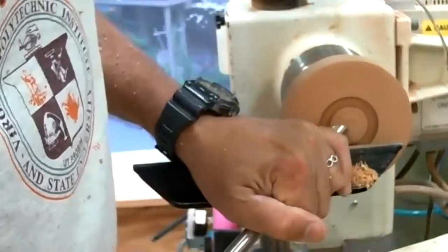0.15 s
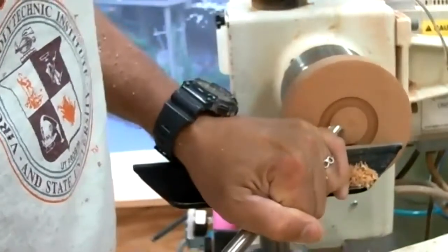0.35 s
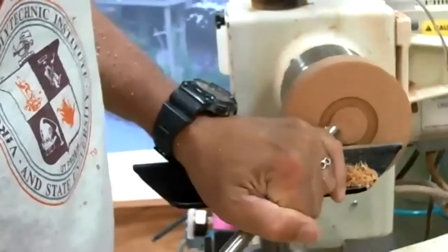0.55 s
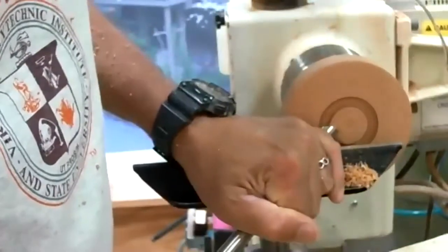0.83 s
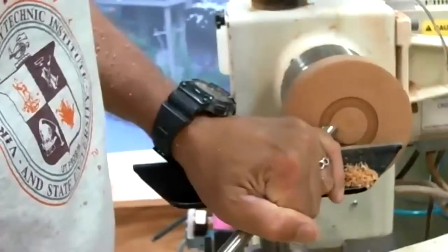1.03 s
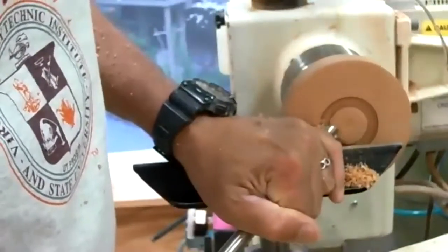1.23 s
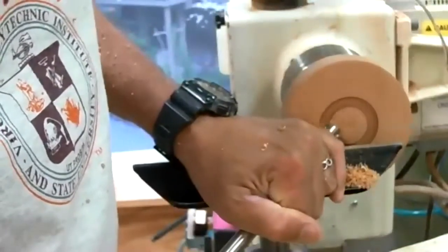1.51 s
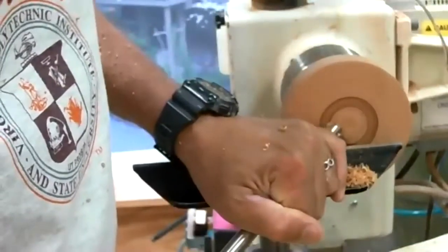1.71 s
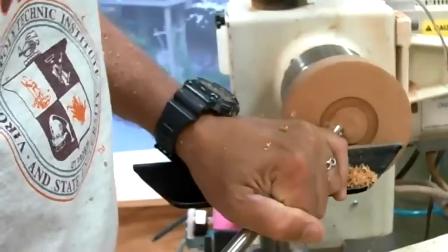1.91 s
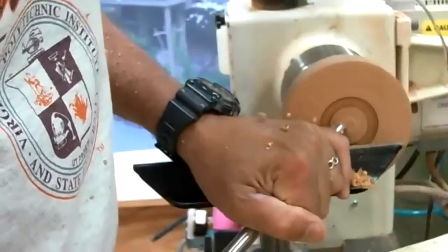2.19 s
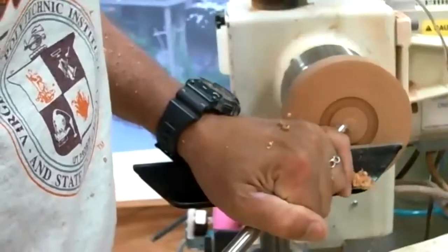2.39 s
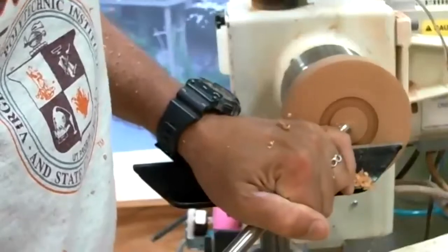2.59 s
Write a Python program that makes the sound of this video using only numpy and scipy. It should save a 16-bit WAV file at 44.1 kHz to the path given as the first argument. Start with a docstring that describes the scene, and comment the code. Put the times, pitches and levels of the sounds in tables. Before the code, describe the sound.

A gouge cuts a spinning wooden bowl: light scrapes, then a loud bright rasp falling in pitch

```python
"""A gouge crosses the face of a small wooden bowl spinning on a lathe, close by in a workshop.
First it skims: light scrapes, a thin hiss, brief hums and squeaks. Then it bites, loud and bright.
From rim to centre the wood passes ever slower, so the tearing chips, dense short grains, fall in pitch.
The cut pulses once a turn. Filtered noise makes the rasp, hiss, dust and shudder; judders, some early
and most of them late, are short wavering tones. At the end the cut fades over a very quiet floor of noise."""
import sys
import numpy as np
from scipy import signal
from scipy.fft import rfft, irfft, next_fast_len
from scipy.io import wavfile
from scipy.ndimage import uniform_filter1d, map_coordinates

SR = 44100
rng = np.random.default_rng(int(sys.argv[2]) if len(sys.argv) > 2 else 0)


def transcribe(signal):
    """Save signal, clipped to [-1, 1], as a 16-bit WAV file at the path in sys.argv[1]."""
    frames = np.atleast_2d(signal).T
    limited = np.clip(frames, -1, 1)
    pcm = np.round(limited * 32767).astype(np.int16)
    wavfile.write(sys.argv[1], SR, pcm)


N = 121275  # length in samples

# How loud the chips are: time_s, level_db
CHIP_LEVEL = [(.13, -105), (.17, -64.5), (.21, -50), (.35, -48.5), (.42, -53), (.56, -65.5), (.66, -52),
              (.73, -63), (.85, -67), (.864, -44.5), (.95, -36.5), (1.0, -54.5), (1.04, -35.5),
              (1.24, -38.5), (1.4, -37), (1.62, -37.5), (1.76, -38.5), (2.02, -45), (2.14, -49),
              (2.35, -54.5), (2.44, -77.5), (2.52, -76), (2.68, -96.5)]
# Middle pitch of the chips, following the speed of the wood under the edge: time_s, pitch_hz
CHIP_PITCH = [(.15, 2080), (.33, 2960), (.46, 1820), (.62, 2720), (.76, 3810), (.855, 4170), (.888, 2050),
              (.95, 2730), (1.04, 2955), (1.31, 2790), (1.46, 2330), (1.54, 2160), (1.59, 1610),
              (1.75, 1615), (1.9, 1234), (1.97, 892), (2.2, 978), (2.45, 800)]
# Broad tone colour of the chips: pitch_hz, level_db
CHIP_COLOUR = [(60, -28), (250, -8), (400, -7.5), (700, 7), (950, -6.5), (1080, -6.5), (1300, -3),
               (1650, 0.5), (1900, -4), (2300, 3), (3400, 4), (4100, -0.5), (5500, -7), (8000, -22)]
CHIPS_PER_S = 2600
CHIP_CYCLES = 4.135  # length of one chip, in cycles of its own pitch
CHIP_SPREAD, CHIP_SIZE_DB = 0.24, 2.5  # random scatter of log pitch, and of size
PITCH_SWING, PITCH_WANDER = .008, .1  # log pitch per dB of force, and by chance
PITCH_SAG, SAG_LEAD = .36, .22  # fall of log pitch over a turn; share of a turn it starts before the peak


def chips(force_db):
    """Fibres snap in dense short grains that ring the bowl and the gouge; their pitch sags each turn."""
    count = CHIPS_PER_S * N // SR
    slots = np.arange(count) + rng.random(count)  # evenly spread, each a little early or late
    start = (slots * (N - 1) / count).astype(int)
    pitch, size, sign = rng.standard_normal((count, 3)).T

    sag = PITCH_SAG * ((turns() + SAG_LEAD) % 1 - .5)
    drift = PITCH_SWING * force_db + PITCH_WANDER * wobble(90) - sag
    centre_hz = curve(CHIP_PITCH) * np.exp(drift)
    hz = np.clip(centre_hz[start] * np.exp(CHIP_SPREAD * pitch), 250, 12000)

    k = np.arange(420)  # samples within one grain
    cycles = hz[:, None] * k / SR
    swell = np.sin(np.pi * np.minimum(cycles / CHIP_CYCLES, 1)) ** 2
    grains = np.sin(2 * np.pi * (cycles - CHIP_CYCLES / 2)) * swell
    strength = np.sign(sign) * amp(CHIP_SIZE_DB * size) * np.sqrt(hz)  # high grains are shorter
    grains *= strength[:, None]
    snaps = np.bincount((start[:, None] + k).ravel(), grains.ravel(), N)[:N]
    ringing = coloured(snaps * amp(force_db), CHIP_COLOUR, ring=1.0)
    return amp(curve(CHIP_LEVEL)) * even(ringing, size=2500)


# Coarse fibres torn by a deep cut: time_s, level_db
TEAR_LEVEL = [(.12, -100), (.2, -65), (.3, -50.5), (.36, -58.5), (.46, -57.5), (.53, -68.5), (.61, -57.5),
              (.69, -79.5), (.87, -88.5), (.92, -45.5), (.965, -50), (1.01, -65.5), (1.09, -46.5),
              (1.24, -52), (1.38, -51), (1.7, -49), (2.0, -43), (2.35, -56.5), (2.6, -89)]
# Tone colour of the tearing: pitch_hz, level_db
TEAR_COLOUR = [(150, -34), (400, -10), (560, -2.5), (750, 1.5), (950, -7), (1300, -0.5), (1700, -5),
               (2400, -17), (5000, -26.5)]


def tearing(force_db):
    """A deep cut tears coarse fibres: patchy noise makes a lower rasp."""
    fibres = patchy(3.6) * amp(.35 * force_db)
    return amp(curve(TEAR_LEVEL)) * even(coloured(fibres, TEAR_COLOUR, ring=0.95), size=2000)


PATCH_DB = 3.4  # unevenness of the hiss, dust and edge noise

# The bevel's hiss: time_s, level_db
HISS_LEVEL = [(.1, -110), (.14, -84), (.2, -54.5), (.35, -54.5), (.42, -62), (.56, -52), (.72, -50),
              (.84, -51.5), (.9, -42.5), (1.0, -43.5), (1.14, -41.5), (1.29, -50), (1.5, -45), (1.75, -50),
              (1.95, -57.5), (2.15, -72), (2.36, -69), (2.5, -102)]
# Tone colour of the hiss: pitch_hz, level_db
HISS_COLOUR = [(300, -49), (1300, -11), (2000, -1.5), (3300, 2.5), (4200, -0.5), (5200, -1), (5900, -5.5),
               (6500, -17), (14000, -22)]


def bevel(force_db):
    """The bevel rubs the wood: noise with fast, gritty flicker makes a hiss."""
    rub = patchy(PATCH_DB) * amp(.6 * force_db + 1.3 * wobble(500))
    return amp(curve(HISS_LEVEL)) * even(coloured(rub, HISS_COLOUR, ring=0.73), size=3000)


# Fine dust: time_s, level_db
DUST_LEVEL = [(.13, -110), (.22, -68), (.34, -61), (.66, -57.5), (.83, -59), (.91, -53.5), (1.17, -45.5),
              (1.23, -71), (1.49, -58.5), (1.8, -88), (2.17, -67), (2.38, -65), (2.55, -88)]
# Tone colour of the dust: pitch_hz, level_db
DUST_COLOUR = [(3000, -52), (5500, -14.5), (6600, 4), (7400, 3), (8400, -11), (14000, -19)]


def dust(force_db):
    """Fine dust flies off: high noise that flickers makes a fizz."""
    fizz = patchy(PATCH_DB) * amp(.6 * force_db + 4 * wobble(35))
    return amp(curve(DUST_LEVEL)) * even(coloured(fizz, DUST_COLOUR), size=4500)


# Thin ring of the gouge's edge: time_s, level_db
EDGE_LEVEL = [(.1, -115), (.25, -62.5), (1.2, -78.5), (1.6, -53.5), (1.98, -49), (2.15, -56), (2.36, -60),
              (2.46, -66.5), (2.51, -78), (2.55, -69.5), (2.6, -81), (2.68, -83), (2.75, -102)]
# Tone colour of the edge: pitch_hz, level_db
EDGE_COLOUR = [(1500, -26), (2300, -5.5), (2650, 1.5), (2900, -1.5), (3300, -0.5), (4000, -16), (5400, -20),
               (6050, -2.5), (6600, -28.5), (7500, -24)]


def edge(force_db):
    """The gouge's edge rings thinly: noise through narrow bands and the tool's resonances."""
    scratch = patchy(PATCH_DB) * amp(.4 * force_db + 2.5 * wobble(40))
    return amp(curve(EDGE_LEVEL)) * even(coloured(scratch, EDGE_COLOUR, ring=.5), size=3000)


# Moments when the force jumps as the edge digs in (below zero: it eases): peak_s, extra_force_db
CATCHES = [(0.214, 4.5), (0.327, 6), (.901, 3.5), (0.945, 2.5), (1.03, 6.5), (1.081, -1), (1.222, 3.5),
           (1.4, 0.5), (1.439, 5), (1.621, 4.5)]
CATCH_RISE_S, CATCH_FALL_S = .002, .011
TURN_DB, HIGH_SPOT_DB = 1.72, -0.2  # swing each turn, and a slight trim at its peak
FLUTTER_DB = 1.68  # change by chance
EVEN_FROM_S, EVEN_OVER_S = 1.62, .2  # nearer the centre the swing per turn halves


def turning():
    """Cutting force in dB: it swings once a turn, flutters, and changes at each catch."""
    t = np.arange(N) / SR
    around = np.cos(2 * np.pi * turns())
    high_spot = ((1 + around) / 2) ** 6
    catch_times = [-CATCH_RISE_S, 0, CATCH_FALL_S / 2, CATCH_FALL_S]
    digs = sum(db * np.interp(t - s, catch_times, [0, 1, 1, 0]) for s, db in CATCHES)
    swing = 1 - np.clip((t - EVEN_FROM_S) / EVEN_OVER_S, 0, 1) / 2
    return swing * (TURN_DB * around + HIGH_SPOT_DB * high_spot) + FLUTTER_DB * wobble(110) + digs


FREE_TURN_HZ, LOADED_TURN_HZ, LOAD_S = 22.85, 22.03, 1.083  # turns per s before and after LOAD_S


def turns():
    """Turns of the spindle since it slows under load at LOAD_S; before that it turns a little faster."""
    t = np.arange(N) / SR - LOAD_S
    return t * np.where(t < 0, FREE_TURN_HZ, LOADED_TURN_HZ)


# Moments when the edge slips off the wood: middle_s, change_db
EDGE_SLIPS = [(0.4, -9), (0.714, -15.5), (0.842, -4.5), (1.114, -4.5), (1.187, -4.5), (1.426, -1),
              (1.46, -6), (1.737, -9.5)]
SLIP_LENGTH_S = 0.0076  # from the middle to about a third of the dip in dB


def contact():
    """Gain of the cut: it drops wherever the edge slips off the wood."""
    t = np.arange(N) / SR
    return amp(sum(db * np.exp(-((t - s) / SLIP_LENGTH_S) ** 2) for s, db in EDGE_SLIPS))


# Short sung notes of the tool: middle_s, length_s, pitch_hz, glide_hz_per_s, level_db
SUNG_NOTES = [(0.126, .03, 424, 0, -60.5), (0.162, 0.011, 1620, 20, -60), (0.181, 0.0079, 5110, 2, -58),
              (0.213, 0.012, 717, 4, -55.5), (.5, 0.081, 1611, 1300.5, -54), (0.519, 0.02, 1630, 0, -47),
              (0.574, 0.031, 1558, -3000, -53.5), (0.701, 0.016, 1591, -1500, -52),
              (0.883, 0.0067, 1394, -9000, -45.5), (2.662, 0.032, 330, -0.5, -72.5),
              (2.673, 0.02, 1228, -3.5, -79)]


def sung_notes():
    """Each is one short, rough, wavering tone, from low hum to high squeak; some slide in pitch."""
    return sum(note(*row) for row in SUNG_NOTES)


# The gouge's shudder: time_s, level_db
SHUDDER_LEVEL = [(.069, -105), (.074, -65.5), (.125, -61.5), (.26, -49.5), (.315, -55), (.36, -69),
                 (.41, -54), (.48, -58.5), (.535, -89), (.6, -74), (.68, -95.5), (.88, -82.5), (.94, -54.5),
                 (1.01, -64), (1.12, -52.5), (1.21, -88.5), (1.37, -50), (1.66, -56.5), (1.74, -62.5),
                 (1.81, -46.5), (2.05, -45.5), (2.13, -50), (2.19, -44), (2.47, -46.5), (2.6, -79),
                 (2.72, -76), (2.75, -98)]
# Tone colour of the shudder: pitch_hz, level_db
SHUDDER_COLOUR = [(25, -40), (140, -28), (200, -26), (290, -14.5), (350, -1.5), (420, -2), (480, -5),
                  (600, -18), (800, -33.5), (3000, -48)]


def shudder(force_db):
    """Uneven pushes, made of noise, set the gouge's lowest resonances going."""
    push = rng.standard_normal(N) * amp(0.48 * force_db + 4.44 * wobble(55))
    ring = even(coloured(push, SHUDDER_COLOUR, ring=0.93), size=1800)
    return amp(curve(SHUDDER_LEVEL)) * wandering(ring, .012)


# A low tone of the gouge swells for a moment: middle_s, pitch_hz, level_db
JUDDERS = [(.264, 421, -47), (0.305, 419, -43.5), (0.578, 428, -51.5), (1.119, 431, -44), (1.519, 438, -43),
           (1.787, 726, -44), (1.888, 428, -41.5), (1.957, 769, -40), (1.978, 399, -40.5),
           (2.031, 775, -46), (2.052, 417, -39.5), (2.088, 749, -43.5), (2.174, 424, -38),
           (2.296, 408, -42.5)]


def judders():
    """A low tone of the gouge swells for a moment: a soft hum early, judders during the cut."""
    return sum(note(s, 0.015, hz, 0, db) for s, hz, db in JUDDERS)


# Low rumble: time_s, level_db
RUMBLE_LEVEL = [(.1, -105), (.25, -77), (.45, -76), (.53, -86), (.78, -77), (.87, -95.5), (1.12, -72),
                (1.25, -85.5), (2.15, -70), (2.56, -98)]
# Tone colour of the rumble: pitch_hz, level_db
RUMBLE_COLOUR = [(25, -18), (90, -13), (140, -1.5), (190, -11), (260, -7), (450, -40)]


def rumble():
    """A low rumble: noise kept mostly below 300 Hz."""
    return amp(curve(RUMBLE_LEVEL)) * even(coloured(rng.standard_normal(N), RUMBLE_COLOUR), size=3000)


def hum():
    """A brief low hum: one wavering tone that swells and fades."""
    return note(s=0.703, length=0.051, hz=145.2, glide=0, db=-67.5)


ROOM_T60_S, ROOM_DB = 0.081, -8.5  # time to die away by 60 dB, and level beside the cut


def workshop(x):
    """A short answer from the machine and the walls: x smeared by fading noise."""
    t = np.arange(SR // 3) / SR
    tail = rng.standard_normal(len(t)) * amp(-60 * t / ROOM_T60_S) * (t > .003)
    return amp(ROOM_DB) * signal.fftconvolve(x, tail / np.linalg.norm(tail))[:N]


# Tone colour of the background noise: pitch_hz, level_db
FLOOR_COLOUR = [(25, 9), (100, -6.5), (1000, -11), (20000, -24.5)]


def noise_floor():
    """A very quiet, steady background: noise that is strongest in the bass."""
    return amp(-99.5) * unit(coloured(rng.standard_normal(N), FLOOR_COLOUR))


def note(s, length, hz, glide, db):
    """A rough, wavering tone that swells to its middle at s and fades; a glide slides its pitch."""
    t = np.arange(N) / SR - s
    wavering_hz = (hz + glide * t) * (1 + .028 * wobble(400))
    phase = 2 * np.pi * np.cumsum(wavering_hz) / SR
    swell = amp(db + 3.4 * wobble(200)) * np.exp(-(t / length) ** 2)
    return swell * np.sqrt(2) * np.sin(phase)


def patchy(depth_db):
    """Noise whose bands swell and fade apart, a few hundred Hz wide and some 20 ms long."""
    bands = signal.stft(rng.standard_normal(N), nperseg=512)[2]
    field = uniform_filter1d(rng.standard_normal(bands.shape), size=4, axis=0)
    field = uniform_filter1d(field, size=4, axis=1)
    return signal.istft(bands * amp(depth_db * unit(field)), nperseg=512)[1][:N]


WANDER_PER_S = 30  # random steps a second


def wandering(x, share):
    """x with its resonances drifting in pitch as the contact and the grip shift."""
    shift = share * SR / WANDER_PER_S * wobble(WANDER_PER_S)  # in samples
    return map_coordinates(x, [np.arange(N) + shift], mode="nearest")


# Resonances of bowl, gouge and rest: pitch_hz, width_hz, lift_db
TOOL_RESONANCES = [(359.2, 13, 9), (423.8, 21, 14.5), (548, 23, 4), (787, 66, 8), (1184, 41, 6.5),
                   (1214, 38, 10.5), (1317, 39, 12.5), (1446, 72, 7.5), (1654, 57, 9.5), (1733, 18, 8),
                   (2290, 67, 5), (2440, 45, 11), (2510, 10, 5.5), (2988, 85, 8.5), (3086, 80, 12),
                   (3226, 86, 7.5), (3700, 81, 7.5), (5146, 120, 8.5)]


def coloured(x, points, ring=0):
    """x through a causal filter: a broad colour, plus ring times the tool's resonances."""
    m = 2 * next_fast_len(N)
    hz = np.fft.rfftfreq(m, 1 / SR)
    lift = 1 + sum((amp(db) ** 2 - 1) / (1 + (2 * (hz - f) / width) ** 2) ** 1.5
                   for f, width, db in TOOL_RESONANCES)  # in power, so its log is halved below
    log_gain = np.log(amp(along(points, hz))) + ring * np.log(np.maximum(lift, .1)) / 2
    # fold the cepstrum forward, so that the filter rings only after each push
    cepstrum = irfft(log_gain)
    cepstrum[1:m // 2] *= 2
    cepstrum[m // 2 + 1:] = 0
    return irfft(rfft(x, m) * np.exp(rfft(cepstrum)))[:N]


def even(x, size):
    """x at rms 1, its swells slower than size samples evened out."""
    power = uniform_filter1d(uniform_filter1d(x * x, size), size)
    return x / np.sqrt(np.abs(power) + 1e-12)


def wobble(rate):
    """A smooth random curve, rate knots a second."""
    return map_coordinates(rng.standard_normal(2048), [np.arange(N) * rate / SR], mode="wrap")


def curve(rows):
    """One value per sample from (time_s, value) rows."""
    return np.interp(np.arange(N) / SR, *np.transpose(rows))


def along(points, hz):
    """Values read from (pitch_hz, value) points on a log pitch axis."""
    f, v = np.transpose(points)
    return np.interp(np.log(hz + 1), np.log(f + 1), v)


def amp(db):
    """Decibels to a plain gain."""
    return 10 ** (np.asarray(db) / 20)


def unit(x):
    """x scaled to rms 1."""
    return x / np.sqrt(np.mean(x ** 2) + 1e-20)


def scene():
    """The cut with its room answer, over the tool's low sounds and the noise floor."""
    force_db = turning()
    wood = chips(force_db) + tearing(force_db)
    rubbing = bevel(force_db) + dust(force_db) + edge(force_db)
    scrape = wandering(wood + rubbing, .002)
    cut = contact() * scrape + sung_notes()
    low = shudder(force_db) + judders() + rumble() + hum()
    return (cut + workshop(cut) + low + noise_floor())[None]


# Tone colour of the microphone: pitch_hz, level_db
MICROPHONE_COLOUR = [(6000, -1.5), (7000, -11), (8000, -29), (8400, -29.5), (14000, -34)]
TOP_HZ = 14400


def record(dry):
    """The microphone loses the high treble and keeps nothing above its band limit."""
    m = next_fast_len(N + SR // 2)
    spectrum = rfft(coloured(dry[0], MICROPHONE_COLOUR), m)
    below_top = np.fft.rfftfreq(m, 1 / SR) < TOP_HZ
    return irfft(spectrum * below_top, m)[None, :N]


dry = scene()
out = record(dry)
transcribe(out)
```